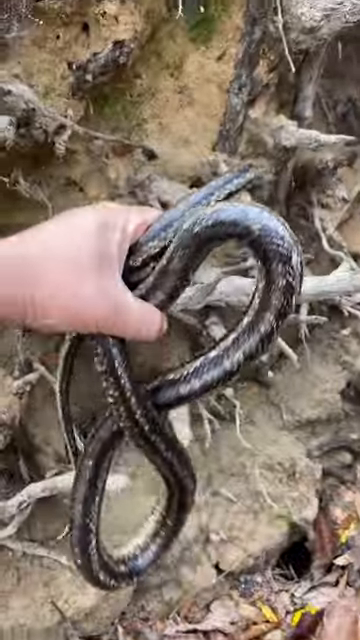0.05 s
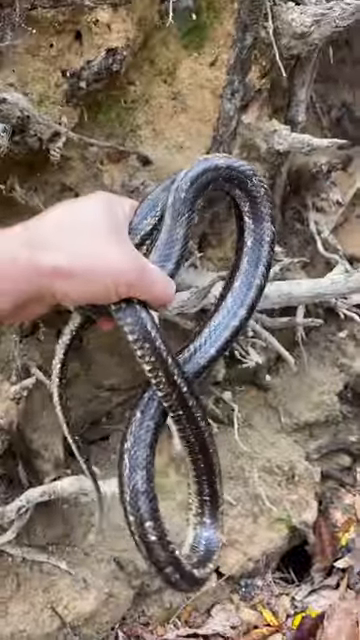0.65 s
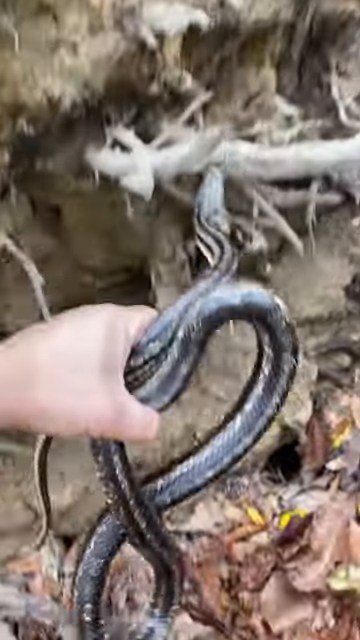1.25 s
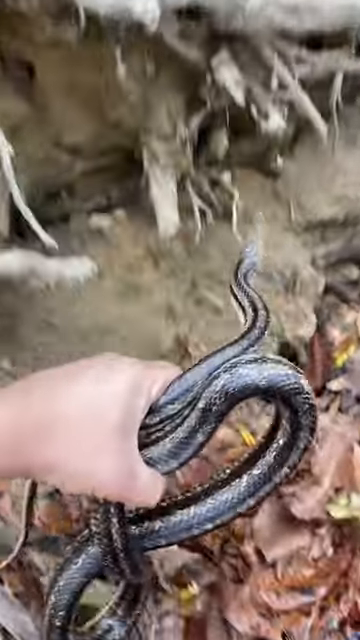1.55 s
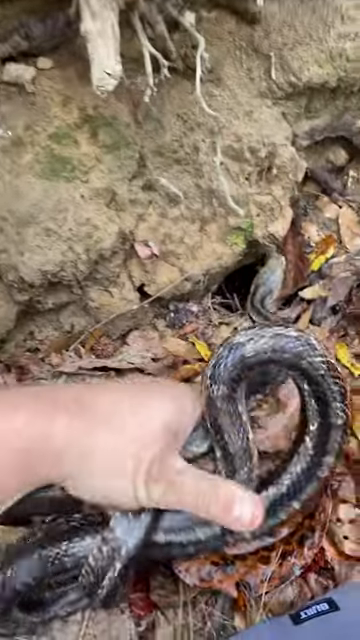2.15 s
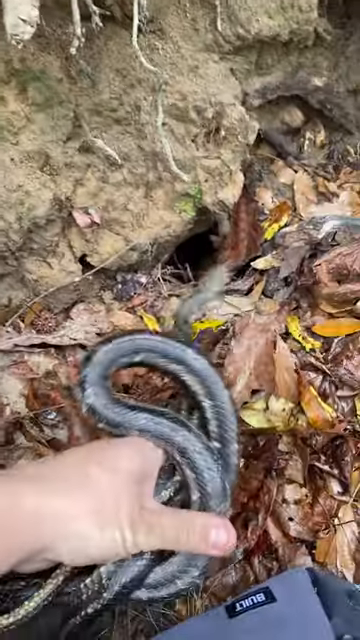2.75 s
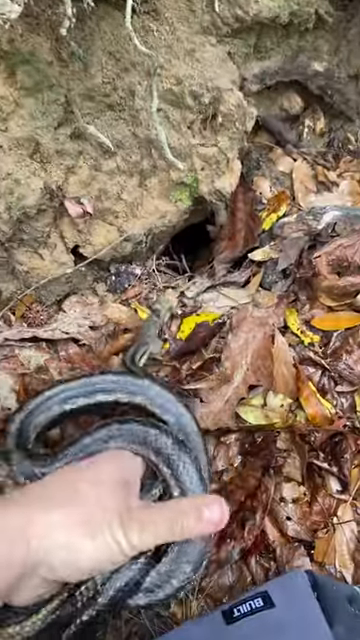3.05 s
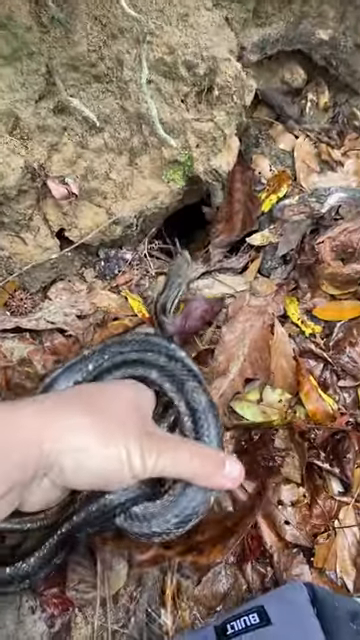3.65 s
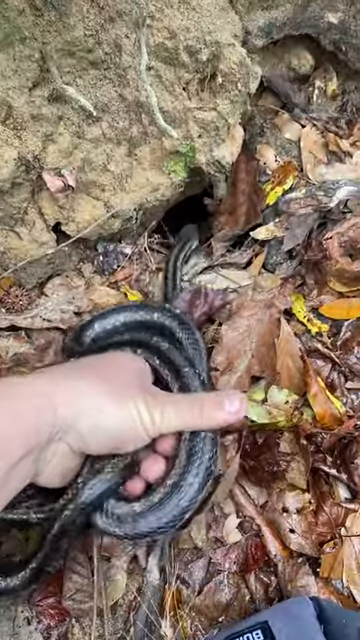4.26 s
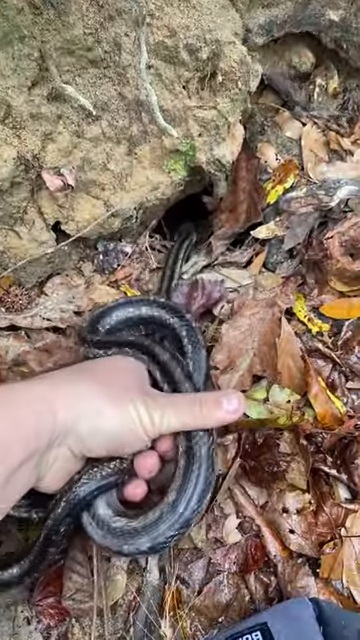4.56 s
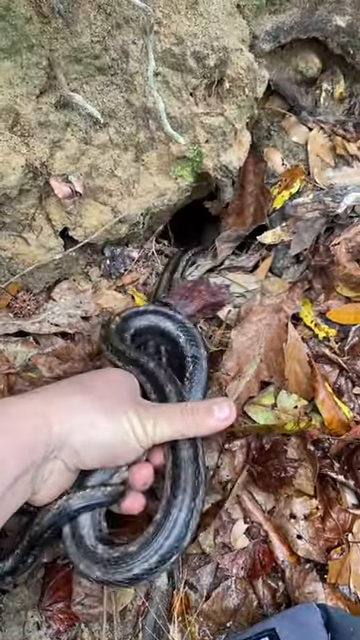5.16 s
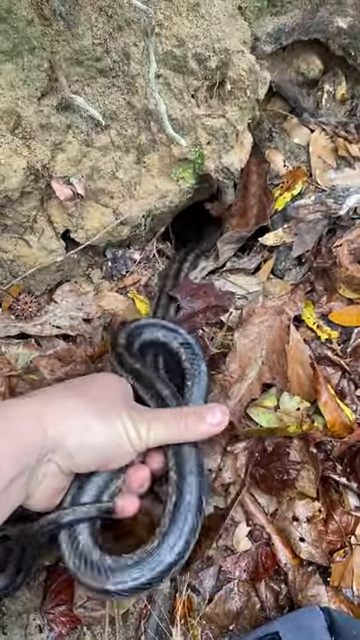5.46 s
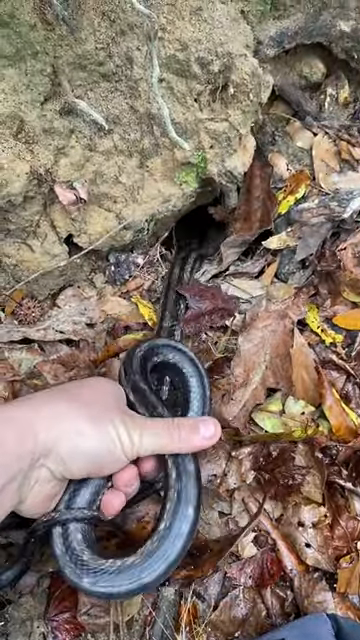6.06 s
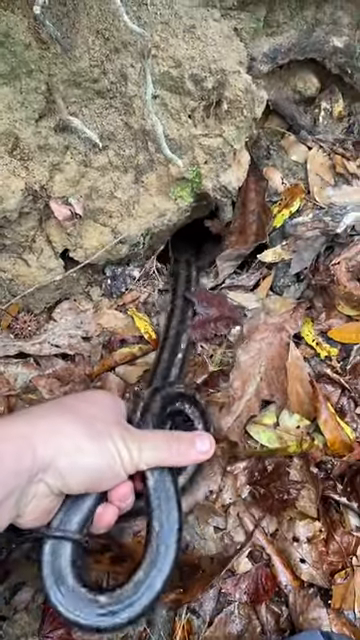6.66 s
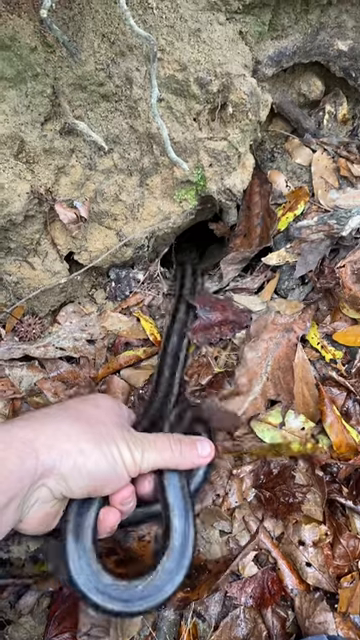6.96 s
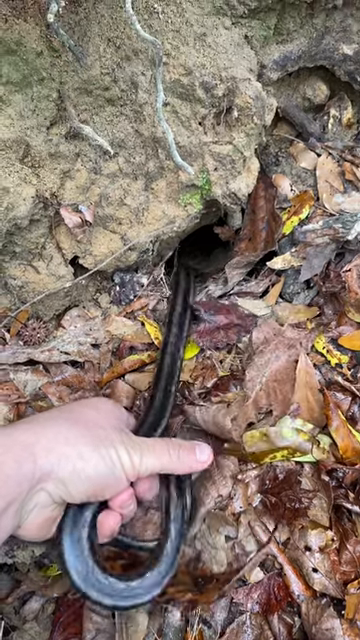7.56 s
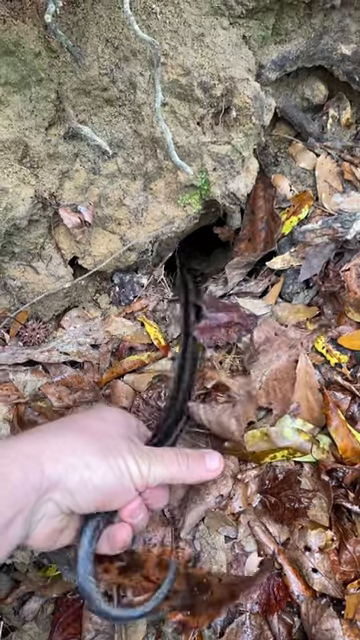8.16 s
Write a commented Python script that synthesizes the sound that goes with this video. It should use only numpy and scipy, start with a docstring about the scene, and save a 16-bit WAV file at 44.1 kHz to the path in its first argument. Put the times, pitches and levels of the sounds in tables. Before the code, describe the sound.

A snake slithers over fallen leaves close to the microphone. It starts with only faint woodland air, soft handling bumps and a deep wind rumble. Scattered small leaf snaps follow, then a continuous dry hiss and rustle with light crunching, crisper each time the body pushes forward. The sliding is strongest near the end, with the wind gently gusting throughout.

```python
"""A snake slides over damp leaf litter: its belly scales hiss, leaves rustle and snap, the litter crunches.
A hand lowers it close to a camera, the coils settle, and it glides off into a hole in a bank.
The friction is noise mixed with tiny stick-slip crackles, crisper whenever a coil shoves.
Soft knocks and a dull finger rub come through the camera's case. Underneath lie a low wind
rumble and faint woodland air, and a far bird chips three times."""
import sys
import numpy as np
from scipy import signal
from scipy.fft import rfft, irfft, next_fast_len
from scipy.io import wavfile
from scipy.ndimage import uniform_filter1d, map_coordinates

SR = 44100
rng = np.random.default_rng(int(sys.argv[2]) if len(sys.argv) > 2 else 0)


def transcribe(u):
    """Save the signal u as a 16-bit wav file named by the first command-line argument.

    u: samples, shape (n,) or (channels, n), limited to [-1, 1]; the rate is SR.
    q: integer samples, one column per channel.
    """
    v = np.clip(np.atleast_2d(u).T, -1, 1)
    q = np.round(v * 32767).astype(np.int16)
    wavfile.write(sys.argv[1], SR, q)


N = 367353

# Faders for the belly's steady glide: t/s, hiss/dB, rustle/dB, crunch/dB
GLIDE = [(1.5, -85, -90, -100), (2.2, -84, -76.5, -91), (2.58, -74.5, -74, -80), (2.76, -83, -81.5, -73),
         (3.34, -73, -73, -80), (3.56, -66, -67, -71), (4.05, -62, -61.5, -66), (4.25, -60, -62.5, -75),
         (4.48, -64.5, -64, -69), (5.25, -62, -62, -71.5), (5.7, -62, -62, -73.5), (6.45, -61, -63, -66),
         (6.92, -54.5, -57.5, -62.5), (7.42, -55, -62, -68.5), (7.8, -58, -60, -65.5),
         (7.93, -60, -65.5, -75.5), (8.33, -60.5, -63.5, -64)]
# Accents as a coil or the hand shoves into the leaves: t/s, length/s, hiss/dB, rustle/dB, crunch/dB
SHOVES = [(1.557, 0.089, -80, -82, -82), (1.695, 0.051, -77, -87, -91), (1.98, 0.25, -74.5, -87, -82),
          (2.31, 0.16, -73, -76.5, -76.5), (2.486, 0.047, -71.5, -66, -69), (2.796, 0.21, -73, -80, -90),
          (3, 0.12, -67.5, -68.5, -91), (3.142, 0.14, -71.5, -71, -76), (3.373, 0.042, -82.5, -69, -79),
          (3.453, 0.0073, -63, -64, -72), (3.78, 0.07, -60.5, -59, -61.5), (4.32, 0.015, -86, -78, -65),
          (4.777, 0.1, -62.5, -67.5, -88), (5.066, 0.15, -63, -79, -76), (5.413, 0.061, -57.5, -59, -61.5),
          (5.878, 0.028, -76, -61, -65.5), (6.108, 0.081, -64, -66.5, -69), (6.588, 0.12, -64, -76, -86),
          (6.84, 0.06, -56.5, -70, -73), (6.925, 0.034, -55, -59, -60), (7.027, 0.043, -64, -59, -71),
          (7.678, 0.051, -72, -81, -65.5), (7.984, 0.16, -59.5, -70, -69.5), (8.27, 0.037, -81, -75, -70.5)]
# EQ for the scales, the leaves and the litter beneath: f/Hz, level/dB
HISS_EQ = [(1500, -8), (3400, -6), (4300, -3), (5400, 0), (7400, 3), (9200, 2.5), (10700, -2), (13000, -17),
           (15000, -12)]
RUSTLE_EQ = [(400, -26), (900, -11), (1400, -10), (1850, -5), (2060, -1), (2230, -1), (2620, 1.5),
             (3100, 0), (3450, -4), (3850, -3), (4400, -3.5), (7000, -8.5), (15000, -32)]
CRUNCH_EQ = [(200, 4), (400, -3), (560, 4.5), (800, -2), (1000, 0.5), (1300, 0), (1700, -0.5), (2600, -30)]

def snake(slow_catch_db=1.0, fast_catch_db=0.8):
    """Scales brush the leaf tops, leaves bend and the litter is crushed; all catch and let go together."""
    hiss_db, rustle_db, crunch_db = curves(GLIDE)
    hiss_shove_db, rustle_shove_db, crunch_shove_db = np.transpose(SHOVES)[2:]
    scale_slips = crackles(per_second=800, centre_hz=6200, cycles=0.62, spread_db=2.5)
    hiss = rubbing(hiss_db, hiss_shove_db, scale_slips, HISS_EQ, patchy_db=1.5)
    leaf_slips = crackles(per_second=900, centre_hz=2480, cycles=0.62, spread_db=2.0)
    rustle = rubbing(rustle_db, rustle_shove_db, leaf_slips, RUSTLE_EQ, patchy_db=2.0)
    litter_slips = crackles(per_second=1200, centre_hz=1570, cycles=0.63, spread_db=3.0)
    crunch = rubbing(crunch_db, crunch_shove_db, litter_slips, CRUNCH_EQ, patchy_db=3.5)
    catching = amp(slow_catch_db * wobble(22) + fast_catch_db * wobble(110))
    return catching * (with_leaf_rings(hiss + rustle) + crunch)


def rubbing(glide_db, shove_db, slips, eq, patchy_db, glide_crisp=0.18, shove_crisp=0.3):
    """Friction: fine slips merge into a hiss in a glide; in a shove more break out as crackles."""
    t = np.arange(N) / SR
    touchdown = np.clip((t - 1.51) / 0.06, 0, 1)  # the coils reach the leaves
    glide_power = (amp(glide_db) * touchdown) ** 2
    shove_power, age = np.zeros(N), t[:SR // 2]
    for (start, length, *_), db in zip(SHOVES, shove_db):
        attack = np.minimum(age / (0.092 * length), 1)
        release = np.exp(-np.maximum(age - length, 0) / 0.028)
        add(shove_power, start, (amp(db) * attack * release) ** 2)
    power = glide_power + shove_power + 1e-20
    crackle_share = np.clip((glide_crisp * glide_power + shove_crisp * shove_power) / power, 0, 1)
    texture = np.sqrt(crackle_share) * slips + np.sqrt(1 - crackle_share) * rng.standard_normal((2, N))
    return np.sqrt(power) * unit(mic_ports(coloured(patchy(texture, patchy_db), eq)))


def crackles(per_second, centre_hz, cycles, spread_db):
    """Random tiny slips, each a ping fading by 1/e in `cycles`; a direct and a scattered copy."""
    when, pitch, strength, *phases = rng.random((int(per_second * N / SR), 5)).T[:, :, None]
    t = np.arange(256) / SR
    hz = np.clip(centre_hz * 4 ** (2 * pitch - 1), 200, SR / 3)  # two octaves either way
    size = amp(spread_db * np.minimum(-np.log(1 - strength), 4.5)) * np.sqrt(hz)
    envelope = size * np.exp(-t * hz / cycles)
    samples = ((when * N).astype(int) + np.arange(len(t))).ravel()
    copies = [envelope * np.sin(2 * np.pi * (hz * t + phase)) for phase in phases]
    return np.array([unit(np.bincount(samples, pings.ravel())[:N]) for pings in copies])


def patchy(x, depth_db):
    """Each leaf passed rings in its own way: random gain over short patches of time and pitch."""
    spectrogram = signal.stft(x, nperseg=512)[2]
    patches = uniform_filter1d(rng.standard_normal(spectrogram.shape[1:]), size=3, axis=0)
    patches = uniform_filter1d(patches, size=6, axis=1)
    return signal.istft(spectrogram * amp(depth_db * patches / patches.std()), nperseg=512)[1][:, :N]


# Leaves that stay under the belly for a while: start/s, end/s, f/Hz, bandwidth/Hz, send level/dB
LEAF_RINGS = [(3.9, 5.4, 2730, 150, -9.5), (5.55, 6.8, 1750, 110, -11), (5.6, 8.3, 2010, 120, -9.5),
              (5.6, 8.3, 3860, 195, -17), (4.0, 8.3, 4260, 140, -22.5), (6.8, 7.9, 2570, 150, -6)]

def with_leaf_rings(rub, fade_s=0.21):
    """The rub plus a papery resonance from each leaf, fading as the belly rolls on and off it."""
    out, t = rub.copy(), np.arange(N) / SR
    for start, end, hz, width, db in LEAF_RINGS:
        contact = np.clip(np.minimum(t - start, end - t) / fade_s, 0, 1)
        resonance = lambda f: 1j * f * width / (hz ** 2 - f ** 2 + 1j * f * width)
        out += amp(db) * filtered(rub * contact, resonance)
    return out


# Leaves and stalks breaking: t/s, level/dB, ring f/Hz, ring mix/dB, body EQ trim/dB, top EQ trim/dB
LEAF_SNAPS = [(1.569, -54.5, 3840, -14, -12, -7), (1.614, -59, 3580, -12, -17, -1),
              (2.0402, -54, 2160, -1, -24, -12), (2.123, -50, 5500, -12, -27, -7),
              (2.2363, -55, 3750, -1, -25, -7), (2.2545, -53, 1770, -21, -22, -12),
              (2.411, -49, 5970, -21, -26, -6), (2.517, -49, 2080, -1, -1, -14),
              (2.584, -50, 7550, -14, -25, -2), (2.594, -43, 2720, -10, -28, -10),
              (2.64, -43.5, 6700, -19, -29, 0), (3.049, -44.5, 6950, -8, -21, -6),
              (3.058, -48, 6500, -12, -21, -4), (3.092, -42, 2260, -15, -23, -3),
              (3.197, -45, 2050, -10, -11, -7), (3.223, -48.5, 1720, 2, -14, -8),
              (3.2792, -48.5, 2780, -6, -6, -25), (3.456, -48, 4170, -24, -8, -8),
              (3.467, -40, 4050, -12, -6, -10), (3.593, -44.5, 3720, -4, -32, -10),
              (3.61, -45.5, 2600, -12, -23, -15), (3.657, -50, 3980, -10, -27, -8),
              (3.672, -39, 2670, -2, -38, -6), (3.6994, -46, 1360, -12, -5, -13),
              (3.75, -39, 2600, -10, -11, -10), (3.792, -43.5, 1350, -7, -19, -6),
              (3.803, -36, 2550, -13, -25, -26), (3.825, -31.5, 2900, -9, -7, 6),
              (3.832, -38, 5570, -16, -24, 0), (3.840, -40, 2430, -10, -10, -1),
              (3.847, -52, 2500, -10, -14, -1), (3.873, -35.5, 2650, -11, -14, 0),
              (3.913, -38, 5400, -12, -17, 2), (3.921, -34, 2690, -11, -1, -2.5),
              (3.928, -37.5, 656, -4, -8, -3), (3.9524, -31, 8100, -11, -38, -3),
              (3.9625, -41.5, 2280, -1, -23, -14), (3.9723, -33, 2430, -9, -32, -9),
              (3.974, -39, 1250, -4, -16, 5), (3.99, -38.5, 1270, -14, -21, 1),
              (4.037, -41, 2500, -6, -27, -4), (4.1996, -37, 2660, -12, -25, -12),
              (4.255, -45, 2620, -9, -22, -10), (4.3264, -43, 2390, -8, -4, -17),
              (4.354, -44, 5360, -5, -27, -18), (4.703, -43.5, 2620, -1, -22, -17),
              (5.123, -43, 5530, -8, -25, -12), (5.234, -44, 7000, -10, -24, -8),
              (5.3604, -45, 2640, -11, -7, -18), (5.402, -38, 2350, -9, -6, -6),
              (5.421, -40, 5200, -1, -16, -8), (5.435, -39.5, 1180, -6, -9, -15),
              (5.440, -34.5, 2490, -2.5, 1, -9), (5.448, -35.5, 2370, -17, -10, 1),
              (5.460, -44, 2000, -15, -4, -13), (5.48, -43, 5280, -7, -10, -12),
              (5.654, -45, 4220, -7, -20, -24), (5.736, -47, 5560, 1, -33, -10),
              (5.89, -41, 2720, -1, -43, -18), (6.137, -43, 5630, -12, -24, -12),
              (6.199, -45, 1980, -7, -13, -10), (6.358, -45, 2060, -3, -18, -18),
              (6.620, -41, 2270, -11, -3, -6), (6.7865, -45, 2610, -1, -12, -14),
              (6.947, -36.5, 7000, -7, -13, -8), (7.198, -40.5, 2050, -5, 5, -9),
              (7.5042, -35.5, 2080, -1.5, 0, -7), (7.598, -43, 2000, -4, -14, -16),
              (7.680, -37, 2470, -13, -8, 3), (7.7217, -39, 1880, -9, -22, -8),
              (7.7473, -37, 2060, -10, 1, -17), (7.753, -41.5, 1970, -9, -8, -10),
              (7.839, -41.5, 1910, -12, -5, -2), (8.060, -39.5, 1970, -13, 3, -10),
              (8.123, -45, 6700, -10, -16, -2), (8.155, -43, 6740, -2, -20, 8),
              (8.280, -48.5, 1670, 8, -6, -22), (8.294, -43, 1020, -6, 4, -22)]

def leaf_snaps(crack_t60=0.01, crumble_t60=0.061, ring_t60=0.026, crack_db=6, scatter_db=-4):
    """A leaf gives way: a sharp crack, a short crumble and the leaf's own brief ring."""
    out, t = np.zeros((2, N)), np.arange(SR // 20) / SR
    for start, db, hz, ring_db, body_db, top_db in LEAF_SNAPS:
        envelope = amp(crack_db - 60 * t / crack_t60) + amp(-60 * t / crumble_t60)
        eq = [(200, body_db - 13), (750, body_db + 9), (2500, 4.8), (4200, 1.6),
              (7500, top_db + 8.5), (12000, top_db - 1), (15000, top_db - 6.5)]
        crack = coloured(rng.standard_normal((2, len(t))) * envelope, eq)
        ring = np.sin(2 * np.pi * hz * t) * amp(ring_db - 60 * t / ring_t60)
        snap = crack / np.abs(crack).max() + ring * amp([[0], [scatter_db]])
        add(out, start, amp(db) * snap / np.abs(snap).max())
    return mic_ports(out)


# Handling bumps, dead centre: t/s, peak level/dB, f/Hz
KNOCKS = [(1.13, -51, 500), (1.237, -50, 486), (1.45, -48.5, 470), (1.461, -54, 420), (1.845, -60, 465),
          (2.488, -57, 383), (6.427, -51, 433), (7.218, -54, 420)]

def handling_knocks(t60=0.036, attack_s=0.0036):
    """Soft contacts near the camera, each one damped low mode."""
    out, t = np.zeros(N), np.arange(SR // 10) / SR
    envelope = amp(-60 * t / t60) * (1 - np.exp(-t / attack_s))
    for start, db, hz in KNOCKS:
        ring = np.sin(2 * np.pi * hz * t) * envelope
        add(out, start, amp(db) * ring / np.abs(ring).max())
    return out


# Fader for the finger rub: t/s, level/dB
GRIP_FADER = [(0, -68), (1.0, -65), (1.4, -55.5), (1.9, -65), (2.3, -66), (2.55, -64.5), (2.85, -66.5),
              (3.3, -67), (4.45, -74), (5.5, -63.5), (6.5, -70), (6.9, -64.5), (8.33, -69)]
# Boxy tone of the camera's case: f/Hz, level/dB
CASE_EQ = [(90, -24), (185, 8.5), (260, 1), (330, 1), (410, -6), (510, -1), (600, -18.5), (1000, -31.5),
           (2500, -61)]

def grip(shift_db=2.8):
    """Fingers shift on the camera, heard dully through its case."""
    level_db = curves(GRIP_FADER)[0] + shift_db * wobble(7)
    return amp(level_db) * noise_bed(CASE_EQ)


# Fader for the wind: t/s, level/dB
WIND_FADER = [(0, -56.5), (0.8, -55), (1.3, -48.5), (1.42, -43.2), (2.08, -43.2), (2.25, -46.5),
              (3.3, -45.5), (3.8, -43), (4.38, -48.5), (4.55, -44.5), (5.7, -44.5), (6.27, -47.5),
              (6.5, -44), (7.3, -46), (7.58, -43), (8.33, -48)]
# EQ for the rumble, and the further low cut on its stereo side signal: f/Hz, level/dB
RUMBLE_EQ = [(15, -18), (25, -22.5), (40, -19.5), (52, 0.5), (63, -1.5), (76, 0.5), (87, 4), (100, -3.5),
             (120, -2), (150, -9), (175, -21.5), (210, -26.5), (280, -46.5), (500, -82)]
SIDE_EQ = [(40, -25), (90, -21), (160, -14), (260, -1)]

def wind(gust_db=1.0):
    """A deep, gently gusting rumble, nearly alike in both ears."""
    mid, side = coloured(rng.standard_normal((2, N)), RUMBLE_EQ)
    running_rms = np.sqrt(np.abs(uniform_filter1d(mid ** 2, size=SR // 7)) + 1e-20)
    even_rumble = (mid + np.outer([1, -1], coloured(side, SIDE_EQ))) / running_rms
    return amp(curves(WIND_FADER)[0] + gust_db * wobble(8)) * even_rumble


# Tone of the wood's air: f/Hz, level/dB
AIR_EQ = [(90, -4.5), (185, 7), (270, -4.5), (380, -11), (750, -10), (900, -14.5), (1100, -16), (1250, -25),
          (2050, -22.5), (2600, -31.5), (4000, -34.5), (5800, -35), (10000, -39.5), (13000, -63)]
# Fader for the air, on top of its base level: t/s, level/dB
AIR_FADER = [(0, 7), (1.65, 8), (1.85, 3), (2.85, 4)]

def woodland_air(base_db=-69, swell_db=1.0):
    """A faint wash of air that drops as the camera is lowered and the bank shields it."""
    level_db = base_db + curves(AIR_FADER)[0] + swell_db * wobble(5.4)
    return amp(level_db) * noise_bed(AIR_EQ)


# Far bird calls: t/s, level/dB, starting f/Hz
BIRD_CHIPS = [(.225, -84, 6260), (.47, -83, 6300), (0.759, -86, 6200)]

def bird(length_s=0.039, fall=0.14, hoarseness=0.29, direct_db=2, trees_t60=0.085):
    """Thin, falling, slightly hoarse chips, smeared by the trees."""
    chips, t = np.zeros(N), np.arange(SR // 5) / SR
    progress = np.minimum(t / length_s, 1)
    for start, db, hz in BIRD_CHIPS:
        jitter = uniform_filter1d(rng.standard_normal(len(t)), size=60)
        pitch = hz * (1 - fall * progress + hoarseness * jitter)
        add(chips, start, amp(db) * np.sin(np.pi * progress) * np.sin(2 * np.pi * np.cumsum(pitch) / SR))
    trees = rng.standard_normal((2, len(t))) * amp(-60 * t / trees_t60)
    reverb = signal.fftconvolve(chips[None], trees / np.linalg.norm(trees[0]), axes=1)[:, :N]
    return amp(direct_db) * chips + reverb


# How alike left and right are: f/Hz, coherence/0-1
PORT_COHERENCE = [(230, 1), (450, .25), (780, .15), (1000, .6), (1750, .9), (2700, .87), (3300, .72),
                  (3520, .25), (4200, .75), (5450, .88), (6200, .8), (9000, .78), (10800, .72), (11550, 1)]
# How far left leads right: f/Hz, phase/rad
PORT_LEAD = [(60, 0), (420, -.5), (580, .6), (1050, .6), (1250, .3), (1850, .5), (2300, 1.3), (3420, 2.1),
             (3680, .1), (4300, 1.1), (4780, 3.1), (5250, 6.1), (7200, 7.5), (10800, 8.7), (11550, 9.42)]
# Balance, left minus right: f/Hz, level/dB
PORT_BALANCE = [(180, -2), (350, -1.5), (1200, -1.5), (2200, -1.5), (3000, -2.5), (3500, 1.5), (4500, -3),
                (5500, 0)]

def mic_ports(pair):
    """Stereo image: a direct and a scattered sound reach two microphone ports round the camera body."""
    width = lambda hz: np.arccos(np.clip(along(PORT_COHERENCE, hz), 0, 1)) / 2
    direct, scattered = filtered(pair, lambda hz: np.array([np.cos(width(hz)), np.sin(width(hz))]))
    half = np.array([[0.5], [-0.5]])
    shade = lambda hz: amp(half * along(PORT_BALANCE, hz)) * np.exp(1j * half * along(PORT_LEAD, hz))
    return filtered(np.array([direct + scattered, direct - scattered]), shade)


def noise_bed(eq):
    """Steady stereo noise through an EQ, its centre at rms 1."""
    return unit(mic_ports(coloured(rng.standard_normal((2, N)), eq)))


def amp(db):
    """Decibels to gain."""
    return 10 ** (np.asarray(db) / 20)


def unit(x):
    """Scale to rms 1; a stereo pair is judged by its centre."""
    return x / np.sqrt(np.mean(np.atleast_2d(x).mean(0) ** 2) + 1e-20)


def along(points, hz):
    """(f/Hz, value) points read on a log frequency axis."""
    freqs, values = np.transpose(points)
    return np.interp(np.log(hz + 1), np.log(freqs + 1), values)


def curves(rows):
    """Automation: one value per sample for each column after the time."""
    times, *columns = np.transpose(rows)
    return [np.interp(np.arange(N) / SR, times, column) for column in columns]


def wobble(rate):
    """A smooth random curve, rate knots a second."""
    return map_coordinates(rng.standard_normal(int(N * rate / SR) + 4), [np.arange(N) * rate / SR])


def filtered(x, response):
    """x through a response given as a function of frequency."""
    n = x.shape[-1]
    padded = next_fast_len(n + 4096)
    return irfft(rfft(x, padded) * response(np.fft.rfftfreq(padded, 1 / SR)), padded)[..., :n]


def coloured(x, eq):
    """x through an EQ of (f/Hz, level/dB) points."""
    return filtered(x, lambda hz: amp(along(eq, hz)))


def add(track, start_s, sound):
    """Mix a short sound into a track."""
    part = track[..., int(start_s * SR):][..., :sound.shape[-1]]
    part += sound[..., :part.shape[-1]]


def scene():
    """Snake and leaves up front, then handling noise, with the wood behind."""
    return snake() + leaf_snaps() + handling_knocks() + grip() + wind() + woodland_air() + bird()


def record(dry):
    """The camera's band limit: a brick-wall high cut."""
    return filtered(dry, lambda hz: hz < 15760)


dry = scene()
out = record(dry)
transcribe(out)
```